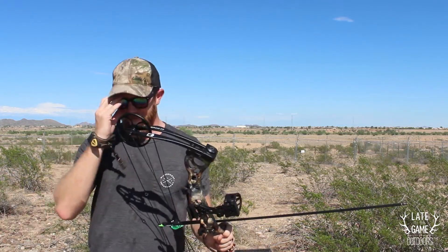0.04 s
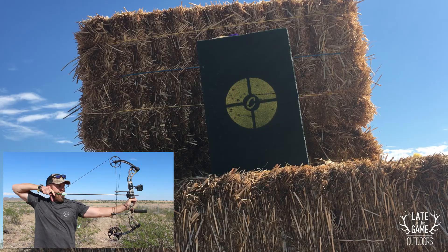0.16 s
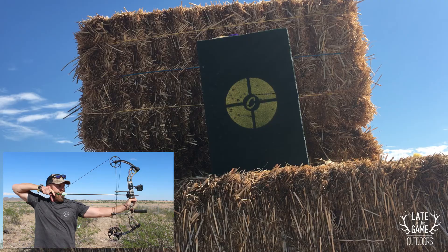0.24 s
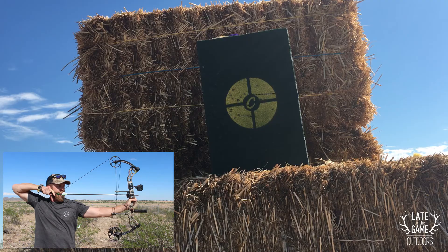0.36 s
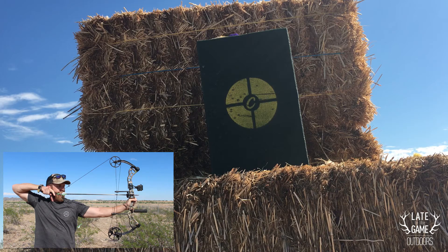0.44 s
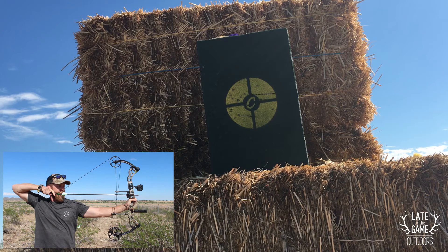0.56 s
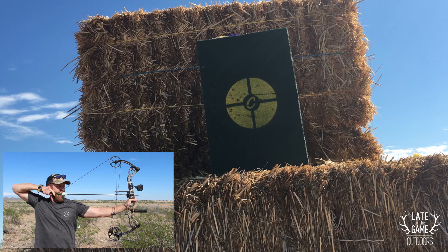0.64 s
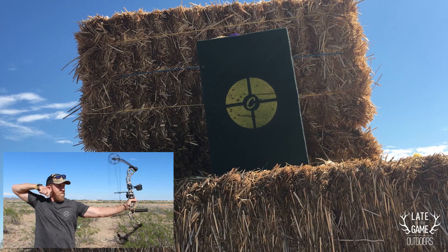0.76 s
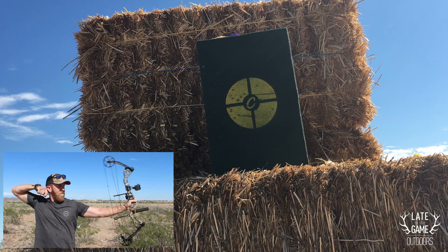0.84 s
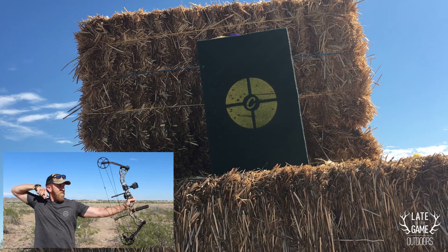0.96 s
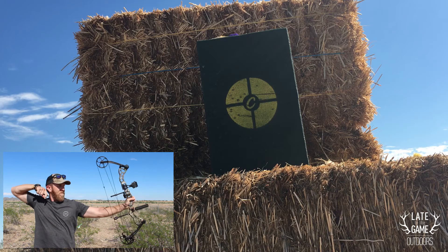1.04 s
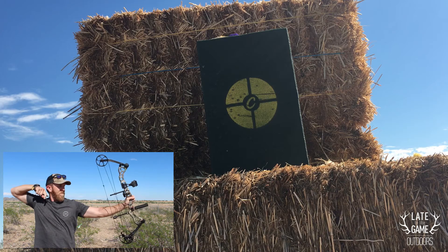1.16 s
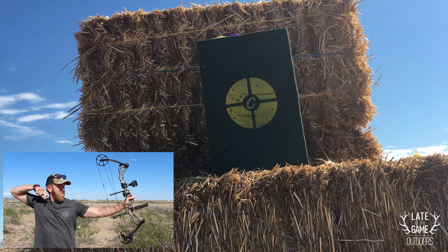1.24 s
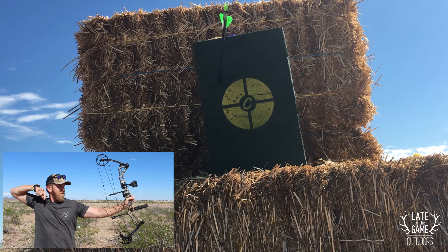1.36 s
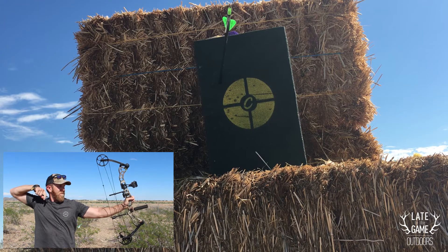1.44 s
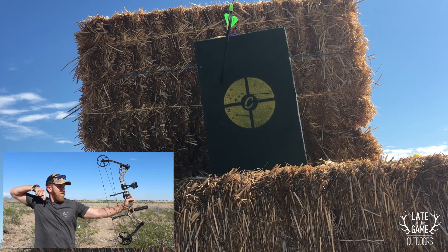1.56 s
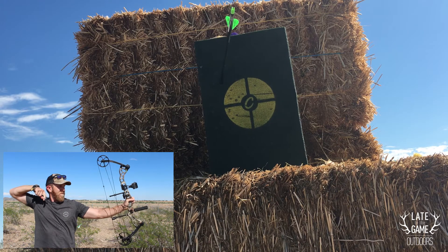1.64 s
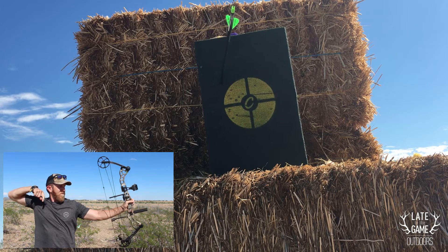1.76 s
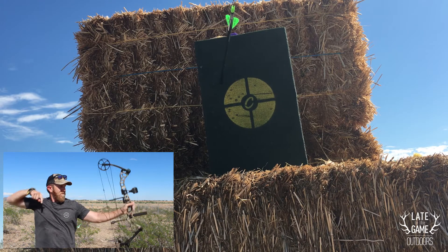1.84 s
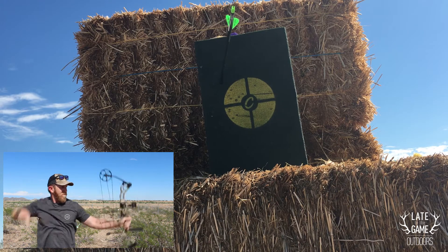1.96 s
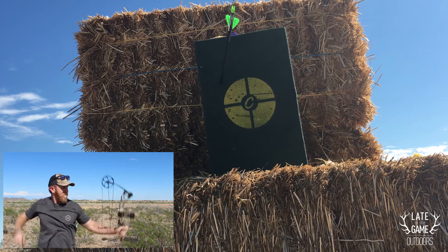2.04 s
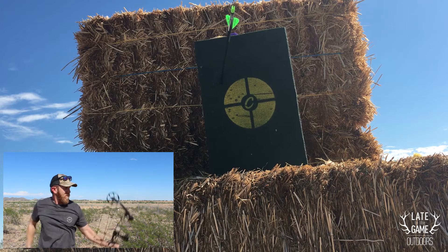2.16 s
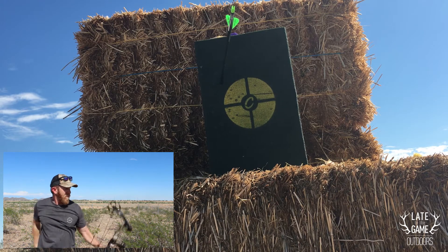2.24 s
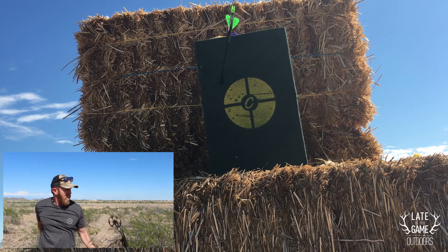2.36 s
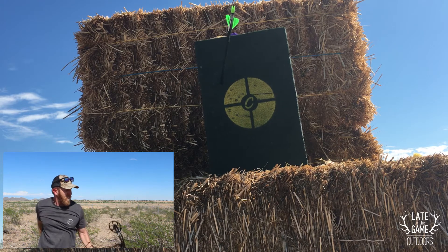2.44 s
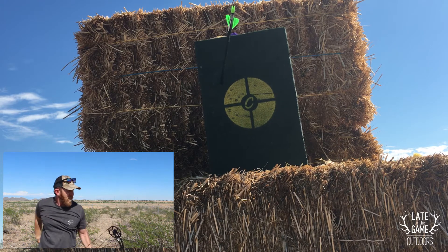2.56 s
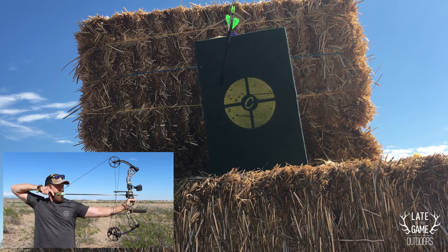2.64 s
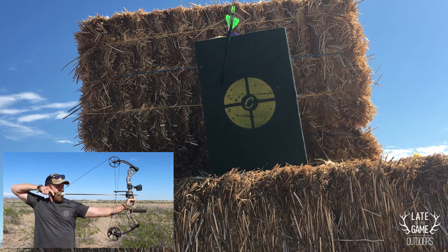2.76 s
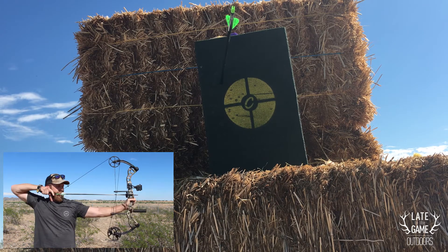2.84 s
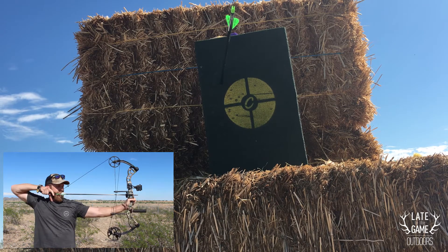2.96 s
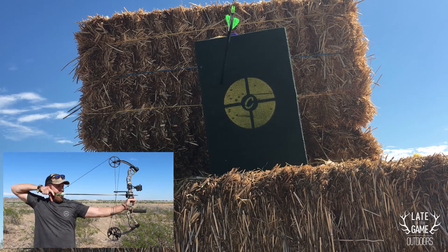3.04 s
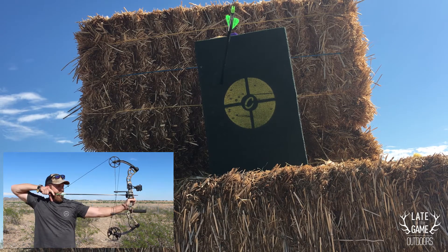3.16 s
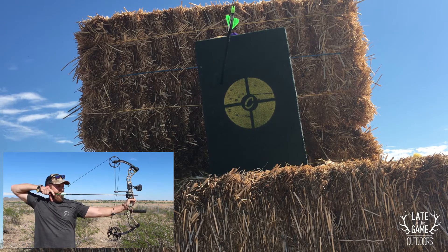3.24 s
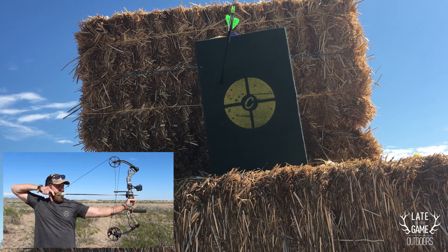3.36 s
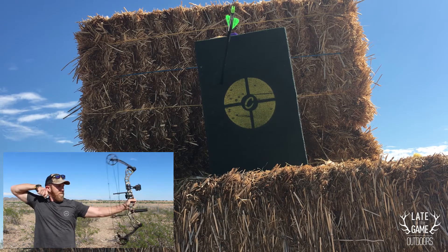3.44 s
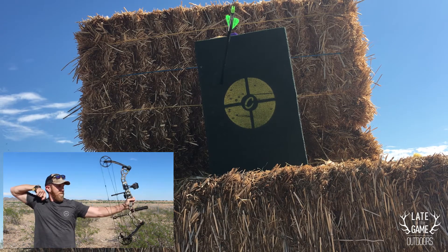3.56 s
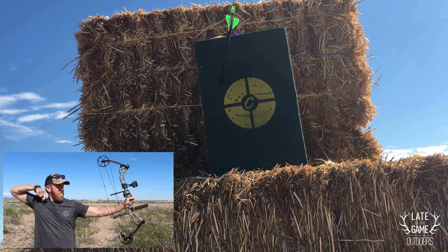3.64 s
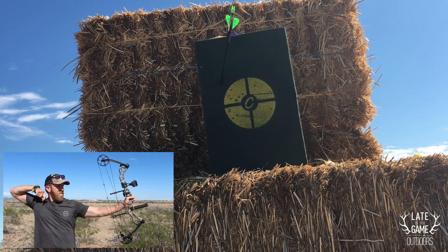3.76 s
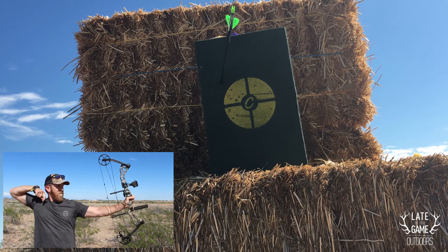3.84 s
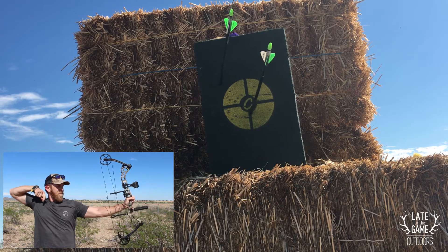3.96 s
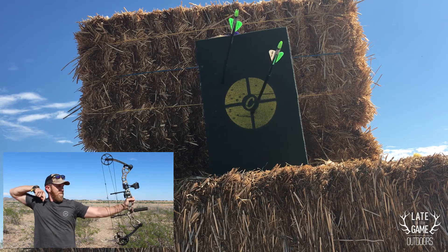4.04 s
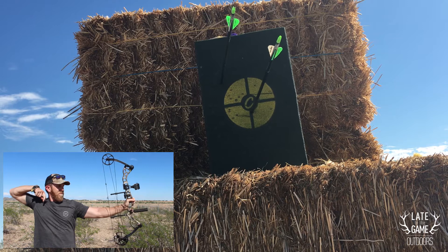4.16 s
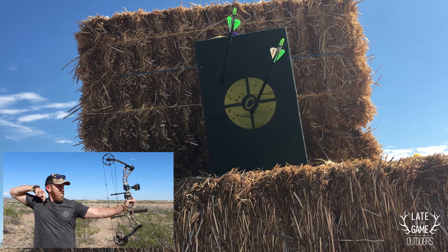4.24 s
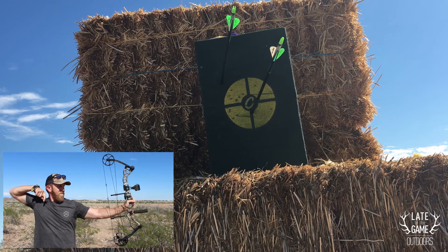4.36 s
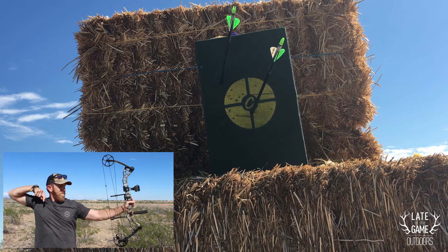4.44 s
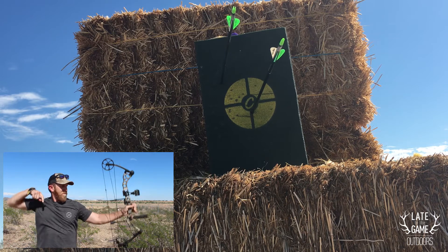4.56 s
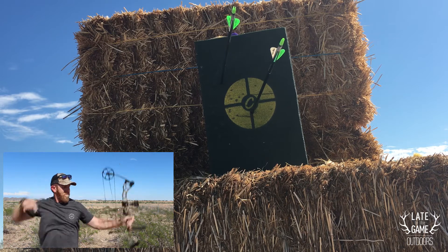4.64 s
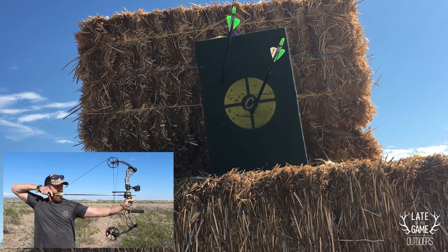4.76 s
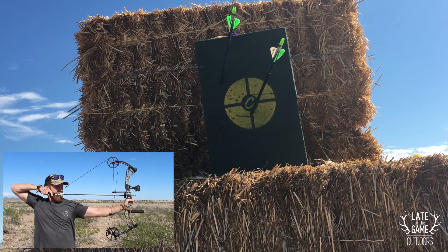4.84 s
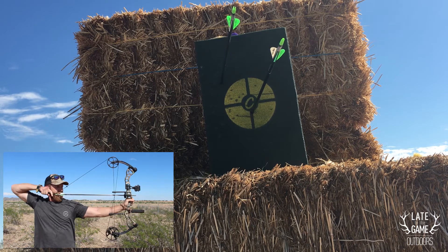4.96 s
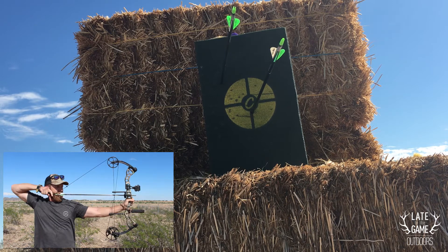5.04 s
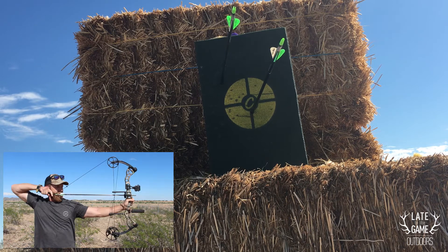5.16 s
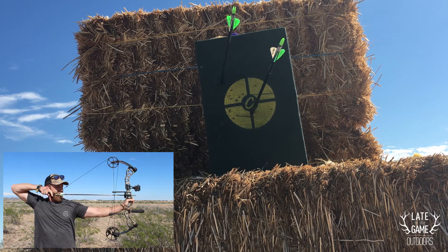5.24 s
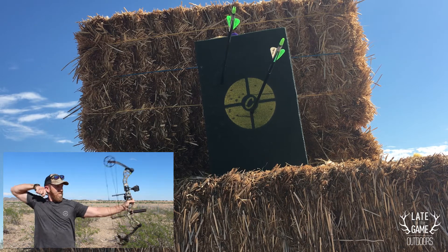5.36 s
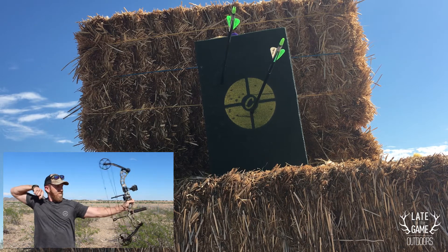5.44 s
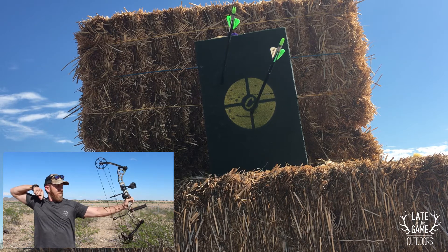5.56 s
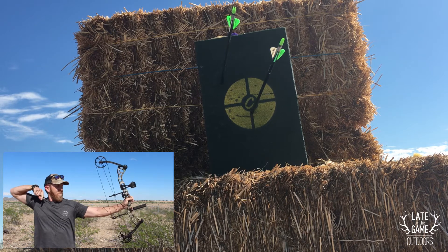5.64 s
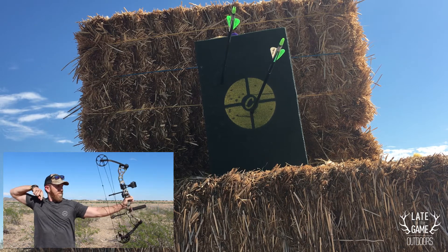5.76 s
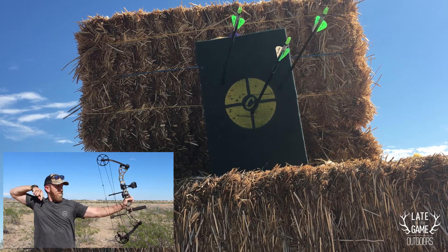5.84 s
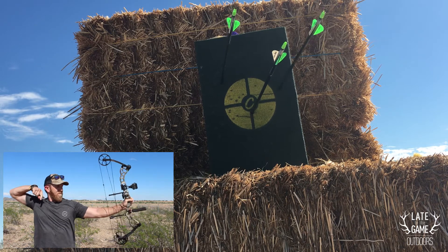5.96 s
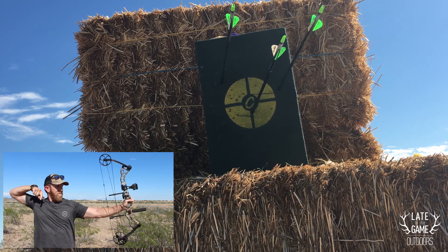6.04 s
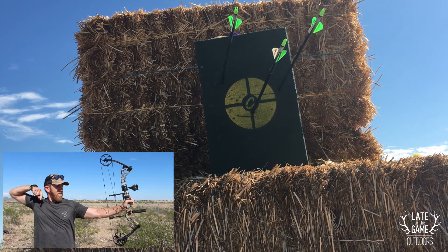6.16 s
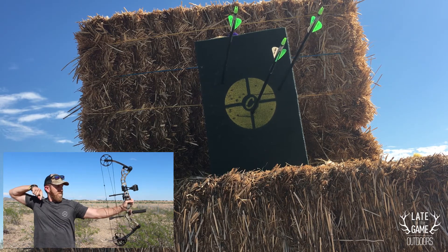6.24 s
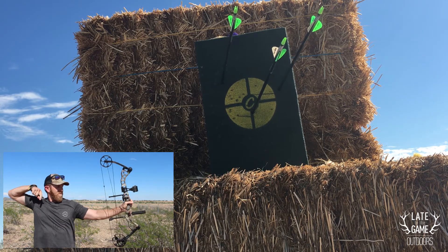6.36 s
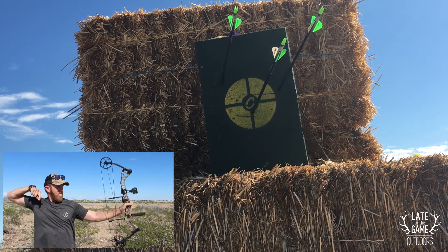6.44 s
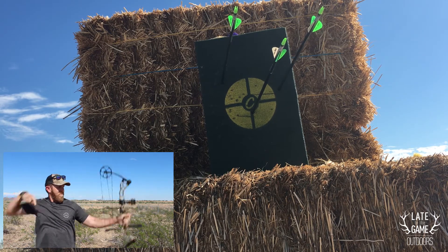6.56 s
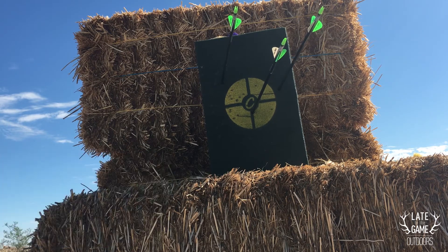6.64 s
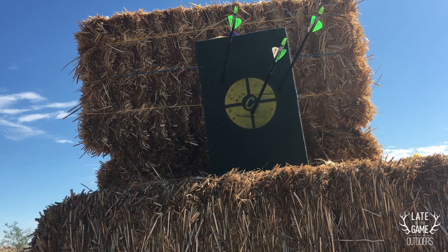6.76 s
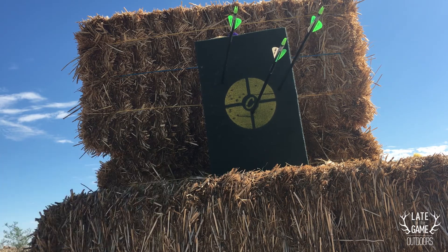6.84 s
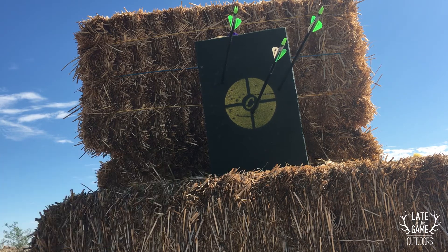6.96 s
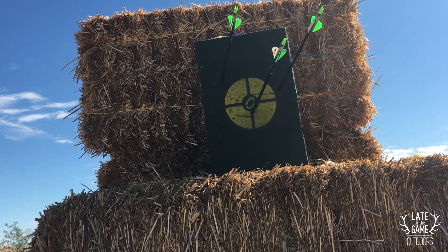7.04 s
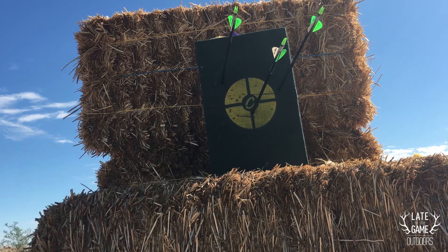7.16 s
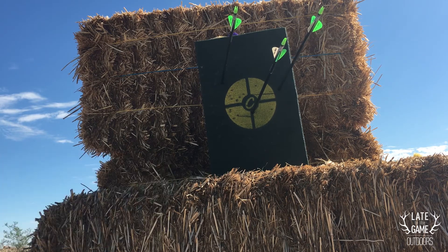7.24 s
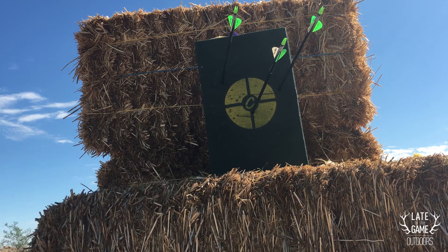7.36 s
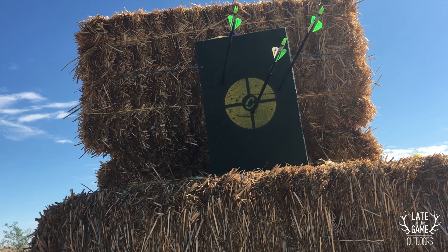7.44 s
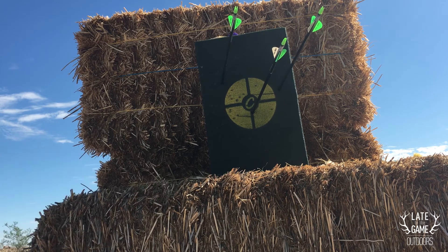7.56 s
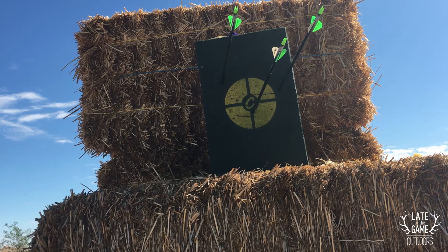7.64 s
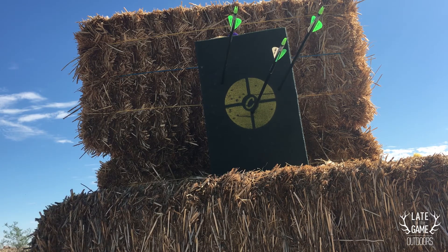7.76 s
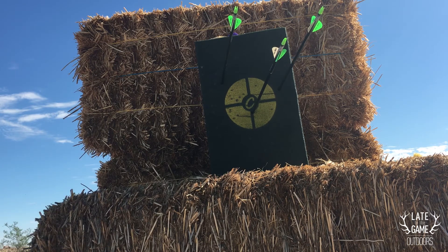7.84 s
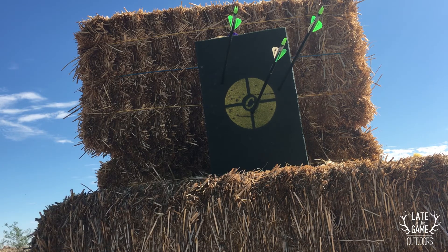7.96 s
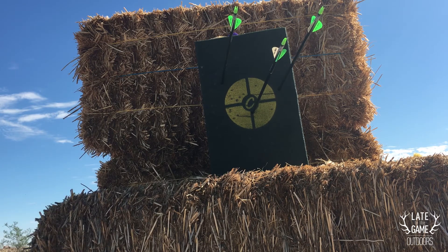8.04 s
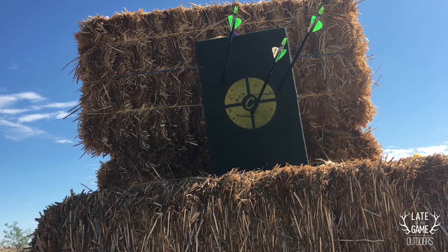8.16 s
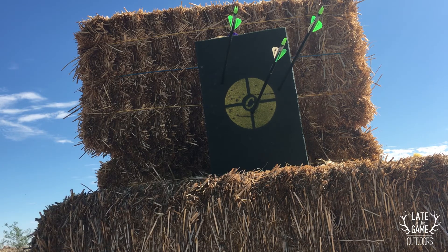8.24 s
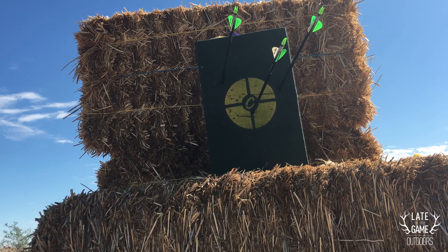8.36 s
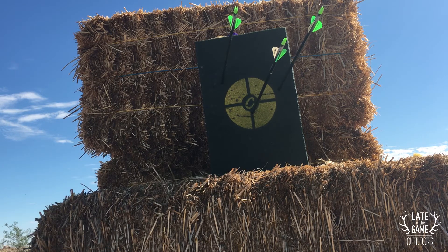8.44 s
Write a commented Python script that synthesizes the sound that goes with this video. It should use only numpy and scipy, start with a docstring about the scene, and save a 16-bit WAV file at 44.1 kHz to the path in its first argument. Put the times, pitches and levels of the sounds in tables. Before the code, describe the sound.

A compound bow fires three times, each sharp snap followed by an arrow thudding into a foam target, over faint hiss and light wind.

```python
"""Three shots from a compound bow at a foam target on straw bales, some 50 m off across open desert. Over still
air and light wind, a wide hiss sets in with a click some while before each shot. At the archer's microphone the
release clicks, the string zips forward and slams home, and the bow ringss. At a second microphone by the target
the vanes hiss in, the point cracks through and the block thuds; a soft hiss and faint crackles follow as the
hit travels back to the archer. Late on an insect ticks, a bird peeps and one faint knock sounds."""
import sys
import numpy as np
from scipy import signal
from scipy.fft import rfft, irfft, next_fast_len
from scipy.io import wavfile
from scipy.ndimage import uniform_filter1d

SR = 44100
rng = np.random.default_rng(int(sys.argv[2]) if len(sys.argv) > 2 else 0)


def materialize(psi):
    """Save the field psi as 16-bit PCM at rate SR to the path in sys.argv[1].

    A 1-D psi becomes a single channel; in a 2-D psi each row is a channel.
    """
    bounded = np.clip(np.atleast_2d(psi).T, -1, 1)
    quanta = np.round(bounded * 32767).astype(np.int16)
    wavfile.write(sys.argv[1], SR, quanta)


N = 374497
TIME = np.arange(N) / SR
AGE = np.arange(SR // 2) / SR  # seconds since a blow


def undb(db):
    """Amplitude ratio: tenfold for every 20 dB."""
    return 10 ** (np.asarray(db) / 20)


def add(track, s, sound):
    """Superposition: a sound adds to a track from time s on."""
    i = int(round(s * SR))
    track[i:i + len(sound)] += sound[:N - i]


def bin_gains(colour, size):
    """FFT bin gains, interpolated in log frequency between (frequency_hz, level_db) points."""
    hz, db = np.transpose(colour)
    bins = np.maximum(np.arange(size // 2 + 1) * SR / size, 1)
    return undb(np.interp(np.log(bins), np.log(hz), db))


def noise(colour, size=len(AGE)):
    """Spectral shaping: white noise filtered to a colour, at rms 1."""
    n = next_fast_len(size)
    y = irfft(rfft(rng.standard_normal(n)) * bin_gains(colour, n), n)[:size]
    return y / y.std()


def stereo_noise(colour, spread_hz=1300):
    """Decorrelation: treble noise in antiphase widens a middle of rms 1."""
    highpass = signal.butter(1, spread_hz, "high", fs=SR, output="sos")
    side = signal.sosfilt(highpass, noise(colour, size=N))
    return noise(colour, size=N) + side * np.array([[1], [-1]])


def impulse(colour, size=2048):
    """Minimum-phase pulse of peak 1: nothing sounds before the blow."""
    cepstrum = irfft(np.log(bin_gains(colour, size)))
    y = irfft(np.exp(rfft(2 * cepstrum[:size // 2], size)))
    return y / np.abs(y).max()


def resonant(peaks):
    """Spectrum of summed resonance curves (centre_hz, width_hz, level_db)."""
    hz = np.geomspace(100, SR / 2, 400)
    gain = sum(undb(db) / (1 + ((hz - centre ** 2 / hz) / width) ** 2) for centre, width, db in peaks)
    return np.column_stack([hz, 20 * np.log10(gain)])


def tilted(colour, slope_db):
    """Spectral tilt of slope_db per octave."""
    return [(hz, db + slope_db * np.log2(hz)) for hz, db in colour]


def fade(t60, rise_s):
    """Exponential decay, 60 dB in t60 seconds, after a quick rise."""
    return (1 - np.exp(-AGE / rise_s)) * 1000 ** (-AGE / t60)


def held(start_s, end_s, attack_s, release_s):
    """Trapezoidal envelope: opens, holds and closes."""
    return np.clip((TIME - start_s) / attack_s + .5, 0, 1) * np.clip((end_s - TIME) / release_s + .5, 0, 1)


def ring(modes, rise_s):
    """Free vibration: damped modes (pitch_hz, level_db, t60_s), alternating in sign, detuned per blow."""
    detune = 1 + .004 * rng.standard_normal(len(modes))
    return sum((-1) ** k * undb(db) * np.sin(2 * np.pi * hz * detune[k] * AGE) * fade(t60, rise_s)
               for k, (hz, db, t60) in enumerate(modes))


def span_and_flight(linger_s=.18):
    """Gating: for each shot, one envelope for the hiss span before the slam and one that lasts until just after
    the hit."""
    return [(held(span[0], shot[0] - span[1], attack_s=.003, release_s=.1),
             held(shot[0], hit[0] + linger_s, attack_s=.06, release_s=.11))
            for span, shot, hit in zip(HISS_SPANS, SHOTS, HITS)]


def dip(depth_db=-10, recovery_s=.2):
    """Gain that drops at each slam and recovers along a Gaussian curve."""
    return undb(depth_db * sum((TIME > s) * np.exp(-((TIME - s) / recovery_s) ** 2) for s, *_ in SHOTS))


# spectra of the still air and the wide hiss: frequency_hz, level_db
STILL_AIR = [(60, -11.5), (115, 2.5), (200, -12), (400, -22.5), (1000, -31.5), (2200, -37), (5000, -39.5),
             (8000, -38), (10500, -37.5), (14000, -35.5), (16000, -35)]
HISS_COLOUR = [(180, -31), (300, -0.5), (667, -3.5), (1040, -1), (1750, -8.5), (2280, -8), (2880, -5),
               (3640, -9), (4830, -8), (5610, -9), (6850, -9), (15000, -11), (16000, -21)]
# resonances of the hollow rush: centre_hz, width_hz, level_db
RUSH_PEAKS = [(400, 220, -5), (930, 340, 1), (1380, 75, -9.5), (1850, 590, -9), (2500, 200, -10.5),
              (2910, 350, -1.5), (3860, 410, -10.5), (5240, 640, -9), (5900, 300, -17), (6770, 400, -12.5),
              (9300, 1000, -18)]
# opening click, hollow rush and wind of each hiss span: start_s, end_before_slam_s, click_db, rush_db, wind_db
HISS_SPANS = [(0.122, 0.01, -30, -67.5, -44), (2.643, 0.075, -51.5, -62.5, -51), (4.762, 0.01, -32, -67.5, -46)]
# hollow rush and wind during each flight: rush_db, wind_db
FLIGHTS = [(-67.5, -48), (-74, -63.5), (-58, -48.5)]
CALM_S = 6.69  # the thin hiss and the breeze end here


def background(still_db=-61, thin_db=-74, span_db=-54.8, opening_db=-65):
    """Gated noise over still air: a wide hiss clicks on before each shot, a hollow rush fills each flight."""
    first_span_s = HISS_SPANS[0][0]
    wide = undb(thin_db) * dip() * held(first_span_s, CALM_S, attack_s=.002, release_s=.07)
    hollow = undb(opening_db) * held(0, first_span_s, attack_s=.002, release_s=.067)
    centre = undb(still_db) * noise(STILL_AIR, size=N)
    for (in_span, flying), span, (flight_db, _) in zip(span_and_flight(), HISS_SPANS, FLIGHTS):
        s, _, click_db, rush_db, _ = span
        wide = np.maximum(wide, undb(span_db) * in_span)
        hollow += undb(rush_db) * in_span + undb(flight_db) * flying
        add(centre, s, -undb(click_db) * np.exp(-AGE / .0045))
    return wide * stereo_noise(HISS_COLOUR) + hollow * stereo_noise(resonant(RUSH_PEAKS)) + centre


# spectrum of the rumble: frequency_hz, level_db
WIND_COLOUR = [(15, -9.5), (30, 6), (65, 1), (120, -8), (200, -17), (400, -30.5), (900, -46), (2000, -72.5)]
# gusts: crest_s, half_length_s, level_db
GUSTS = [(.6, 0.037, -33), (.72, .05, -38.5), (2.169, 0.063, -48.5), (3.929, 0.07, -47),
         (5.65, 0.0797, -48), (6.6, .15, -54.5), (8.47, 0.044, -55)]
# wind bumping a microphone: start_s, level_db, pitch_hz, rise_s
BUFFETS = [(0.1232, -26, 42.8, 0.0011), (0.598, -18, 68.3, 0.018), (1.772, -21.5, 47.6, 0.0012)]


def wind(breeze_db=-52, calm_db=-62.5, gust_top_hz=110):
    """Turbulence at the microphones: a rumble, stronger around each shot, with deep gusts and bumps."""
    breeze = undb(breeze_db) * dip() * held(0, CALM_S, attack_s=.0016, release_s=.2)
    power = undb(calm_db) ** 2 + breeze ** 2  # incoherent sources add in power
    for (in_span, flying), (*_, span_db), (_, flight_db) in zip(span_and_flight(), HISS_SPANS, FLIGHTS):
        power += (undb(span_db) * in_span) ** 2 + (undb(flight_db) * flying) ** 2
    rumble = noise(WIND_COLOUR, size=N) + undb(-26) * noise(WIND_COLOUR, size=N) * np.array([[1], [-1]])
    deep = signal.sosfilt(signal.butter(2, gust_top_hz, fs=SR, output="sos"), noise(WIND_COLOUR, size=N))
    gusts = sum(undb(db) * np.exp(-((TIME - s) / half_s) ** 2 / 2) for s, half_s, db in GUSTS)
    bumps = np.zeros(N)
    for s, db, hz, rise_s in BUFFETS:
        add(bumps, s, undb(db) * ring([(hz, 0, .13)], rise_s=rise_s))
    return rumble * np.sqrt(power) + deep * gusts + bumps


def bird(start_s=4.672, pitch_hz=1840, level_db=-55):
    """A damped pure tone: one faint, far peep."""
    out = np.zeros(N)
    add(out, start_s, undb(level_db) * np.sin(2 * np.pi * pitch_hz * AGE) * fade(t60=.05, rise_s=.004))
    return out


# runs of insect ticks: start_s, tick_count, level_db
TICK_RUNS = [(4.556, 3, -61), (6.485, 2, -62), (6.620, 3, -59.5), (6.877, 2, -65.5), (7.062, 1, -58.5),
             (8.245, 1, -65.5), (8.476, 1, -65.5)]


def insect(gap_s=.058, width_s=.006):
    """Pulse trains from the scrub: evenly spaced Gaussian bursts of very high noise."""
    out = np.zeros(N)
    burst = np.exp(-(AGE / width_s - 5) ** 2 / 2)
    for s, count, db in TICK_RUNS:
        for k in range(round(count)):
            rasp = noise([(4500, -16.5), (6800, -3), (9000, 4), (14500, 1), (16000, -9)])
            add(out, s + k * gap_s - 5 * width_s, undb(db) * rasp * burst)
    return out


# a knock once the last arrow is in: start_s, level_db, pitch_hz
KNOCK = (6.385, -60.5, 1500)


def small_knock():
    """A broad resonance dies quickly: one faint, dry knock."""
    out, (s, db, hz) = np.zeros(N), KNOCK
    add(out, s, undb(db) * noise(resonant([(hz, hz, 0)])) * fade(t60=.04, rise_s=.001))
    return out


def hiss_and_crackle(hiss_db=-66, crackles_per_s=45, crackle_db=-54, scatter_db=3, decay_s=.3):
    """A soft steady hiss holds briefly after each hit; faint straw crackles fade as a Poisson process."""
    out, hiss = np.zeros(N), noise(HISS_COLOUR, size=N)
    for s, *_ in HITS:
        out += undb(hiss_db) * hiss * held(s, s + .42, attack_s=.0099, release_s=.06)
        waits = np.cumsum(rng.exponential(size=20)) / crackles_per_s
        for wait, db in zip(waits, crackle_db + scatter_db * rng.standard_normal(20)):
            stalk = undb(db) * noise(BRIGHT_COLOUR) * fade(t60=.021, rise_s=.00031)
            add(out, s + wait, stalk * np.exp(-wait / decay_s))
    return out


# spectrum of the vanes, also of bright snaps and crackles: frequency_hz, level_db
BRIGHT_COLOUR = [(290, -39), (500, -14.5), (1300, -6), (2810, -2.5), (4940, -7), (6330, -8), (9920, -11.5),
                 (14000, -9.5), (16000, -10.5)]


def vanes(swell_s=.018):
    """Flow noise of the fletching, swelling as the arrow closes in and ending at the impact."""
    swell = np.exp(-(AGE / swell_s) ** 2) + .14 * np.exp(-AGE / .031)
    return (noise(BRIGHT_COLOUR) * swell)[::-1]


# spectra of the hit at the target and back at the archer: frequency_hz, level_db
CRACK_COLOUR = [(200, -8.5), (550, 3.5), (950, -12.5), (1400, -6.5), (2150, 4.5), (3100, -14.5),
                (3900, -2.5), (4600, -14.5), (5700, -2), (7800, -14), (12000, -13), (16000, -16)]
FAR_COLOUR = [(150, -2.5), (420, -0.5), (700, -0.5), (1050, -0.5), (1400, -9.5), (1800, -11), (2200, -5),
              (2900, -16), (3900, -22), (5400, -14.5), (6300, -38), (8000, -71), (11000, -79)]
# modes of the foam block: pitch_hz, level_db, t60_s
BLOCK_MODES = [(72.6, -8.5, 0.13), (137.9, -2.5, 0.0503), (243, -2.5, 0.034), (405.7, -1, 0.043),
               (545.5, -5.5, 0.0269)]
# impacts, with relative gains: start_s, crack_db, rub_db, thud_db, vane_db, far_db, tilt_db_per_octave
HITS = [(1.4604, -15.5, -21.5, -19.5, -33, -36, -1), (4.1200, -14, -27.5, -15.5, -35, -35.5, 1.5),
        (6.024, -12, -22.5, -16, -34, -39, 1.5)]
# the point snapping through a tougher layer: start_s, level_db
LAYER_SNAPS = [(1.4631, -3.5), (1.4656, -22.5), (4.1224, -13.5)]


def target(stop_s=.0092, travel_s=.142):
    """Inelastic impact: the point cracks the skin, friction stops the shaft, the block shoves the straw."""
    out = np.zeros(N)
    for s, crack_db, rub_db, thud_db, vane_db, far_db, tilt_db in HITS:
        near, far = tilted(CRACK_COLOUR, tilt_db), tilted(FAR_COLOUR, tilt_db)
        add(out, s - len(AGE) / SR, undb(vane_db) * vanes())
        add(out, s, undb(crack_db + 7) * impulse(near))
        add(out, s, undb(crack_db + 5) * noise(near) * fade(t60=.0087, rise_s=.0001))
        add(out, s, undb(rub_db) * noise(near) / (1 + (AGE / stop_s) ** 12))
        add(out, s, undb(thud_db - 11.5) * ring(BLOCK_MODES, rise_s=.0022))
        add(out, s + stop_s, undb(thud_db + 3.5) * ring(BLOCK_MODES, rise_s=.0024))
        straw = noise(CRACK_COLOUR) * undb(4 * np.repeat(rng.standard_normal(len(AGE) // 50), 50))
        crush = undb(-38.5) * fade(t60=.062, rise_s=.0011) + undb(-64) * fade(t60=.56, rise_s=.01)
        add(out, s + stop_s, straw * crush)
        # the sound travels back to the archer, dulled by the air and scattered by the ground
        back_s = s + travel_s
        scatter = noise(far) * (fade(t60=.03, rise_s=.00071) + undb(-20) * fade(t60=.33, rise_s=.0028))
        block_face = ring([(1065, 1, .039), (844, -5, .046)], rise_s=.00024)
        add(out, back_s, undb(far_db + 11) * impulse(far))
        add(out, back_s, undb(far_db + 4.5) * scatter + undb(far_db + 3) * block_face)
        add(out, back_s + stop_s, undb(far_db + 4.5) * ring(BLOCK_MODES[2:], rise_s=.001))
    for s, db in LAYER_SNAPS:
        add(out, s, undb(db) * noise(CRACK_COLOUR) * fade(t60=.012, rise_s=.0002))
    return out


# spectrum of the zip's grit, the release and the sliding shaft: frequency_hz, level_db
RELEASE_COLOUR = [(350, -34.5), (600, -6.5), (1280, -9), (2990, -3), (4160, -12.5), (5790, -9.5),
                  (8390, -18), (12800, -19.5), (16000, -30)]


def string_zip(pitch_hz, stroke_s, doubling_s=.0058, swell_s=.0028, roughness=.86, grit=.15):
    """A rough exponential chirp: the string races over the cams, passing pitch_hz 5 ms before the slam."""
    t = AGE[:int((stroke_s + .002) * SR)] - stroke_s  # zero at the slam
    hz = np.minimum(pitch_hz * 2 ** ((t + .005) / doubling_s), SR / 3)
    wobble = uniform_filter1d(rng.standard_normal(len(t)), size=16) * roughness
    phase = 2 * np.pi * np.cumsum(hz * (1 + wobble)) / SR
    swell = np.exp(-np.abs((t + .0019) / swell_s) ** 1.1) * np.clip((t[-1] - t) / .0028, 0, 1)
    return swell * (1.3 * np.sin(phase) + grit * noise(RELEASE_COLOUR, size=len(t)))


# spectrum of the bow's rattle: frequency_hz, level_db
RATTLE_COLOUR = [(71, -41), (120, -12), (334, -7.5), (393, -11.5), (493, -0.5), (684, -8), (1260, -7.5),
                 (1460, -19.5), (1750, -8.5), (2290, -20.5), (3050, -9.5), (4230, -30), (5520, -26),
                 (13000, -40.5), (16000, -49)]


def string_rattle(rate_hz=105, tap_s=.0019):
    """Amplitude modulation: noise pulses as the swinging string taps its stop, never quite evenly."""
    jitter = np.repeat(rng.standard_normal(50), len(AGE) // 50)
    cycles = np.cumsum(rate_hz * (1 + .15 * jitter) / SR)
    taps = np.exp(-(cycles % 1) / rate_hz / tap_s)
    rattle = undb(-23) * noise(RATTLE_COLOUR) * fade(t60=.23, rise_s=.0035) * (1 + .8 * taps)
    ticks = undb(-24.5) * noise(BRIGHT_COLOUR) * fade(t60=.12, rise_s=.003) * taps
    return rattle + ticks


# spectrum of the string slamming home: frequency_hz, level_db
SLAM_COLOUR = [(71, -44), (120, -21.5), (454, -6.5), (1340, -10.5), (1680, -3.5), (2240, -7), (3050, 1.5),
               (3520, -13.5), (5080, -21), (6240, -13.5), (7350, -25), (13600, -37), (16000, -46)]
# modes of the stiff, heavily damped frame: pitch_hz, base_width_hz, level_db
FRAME_MODES = [(279, 23.5, -8), (440, 31, -6.5), (523, 17, -1), (670, 27.5, -5.5), (891, 22, -4),
               (1059, 32.5, -1.5), (1516, 85, -9), (2006, 19.5, -9), (2450, 26.5, -12.5), (2500, 48, -4.5),
               (3110, 76, -3), (5900, 59, -16), (6400, 60.5, -17.5), (6770, 25, -22)]
# modes of the limbs and cables, and of the string: pitch_hz, level_db, t60_s
LIMB_MODES = [(805, -2.5, 0.15), (886, -2.5, 0.21), (1060, -4.5, 0.12), (1255, -3, 0.16), (1810, 0.5, 0.14),
              (1940, -4.5, 0.089), (2130, -4, 0.057), (3050, -5, 0.13), (3116, -6, 0.099),
              (3780, -19.5, .11)]
STRING_MODES = [(221.5, -13, 0.59), (501, -.5, 0.4)]
# shots, with relative gains: slam_s, level_db, click_db, click_hz, zip_db, zip_hz, snap_db
SHOTS = [(0.8088, 1.5, -27.5, 2796, -10.5, 2955, -10.5), (3.4676, 1, -29.5, 1920, -9.5, 2550, -6.5),
         (5.3750, 1.5, -23, 2960, -11.5, 2710, -9.5)]


def bow(stroke_s=.026, second_cam_s=.0043, body_cutoff_s=.06, twang_cutoff_s=.128):
    """Impulse excitation: the released string drives the arrow, slams home and sets the bow ringing."""
    out = np.zeros(N)
    frame_modes = [(hz, db, 1.9 / (width + 22)) for hz, width, db in FRAME_MODES]  # wider dies sooner
    for s, db, click_db, click_hz, zip_db, zip_hz, snap_db in SHOTS:
        loose_s = s - stroke_s
        jaw_noise = 1.2 * noise(RELEASE_COLOUR) * fade(t60=.01, rise_s=.00026)
        jaw_ring = ring([(click_hz, 2, .02)], rise_s=.00046)
        add(out, loose_s, undb(click_db) * (jaw_noise + jaw_ring))
        slide = noise(RELEASE_COLOUR) * fade(t60=.25, rise_s=.0011) / (1 + (AGE / stroke_s / 2) ** 4)
        add(out, loose_s - .003, undb(-42) * slide)  # the shaft slides off its rest
        add(out, loose_s, undb(zip_db) * string_zip(zip_hz, stroke_s))
        # the two cams come home a few milliseconds apart
        add(out, s, undb(-2) * impulse(SLAM_COLOUR))
        add(out, s + second_cam_s, undb(-7) * impulse(SLAM_COLOUR))
        slam = undb(-5.5) * noise(SLAM_COLOUR) * fade(t60=.032, rise_s=.00069)
        snap = undb(snap_db) * noise(BRIGHT_COLOUR) * fade(t60=.011, rise_s=.0018)
        frame = undb(-11) * ring(frame_modes, rise_s=.00089)
        limbs = undb(-28.5) * ring(LIMB_MODES, rise_s=.003)
        # the rattle cuts off first, then the string's note drops away quickly
        body = (limbs + string_rattle()) / (1 + (AGE / body_cutoff_s) ** 5)
        twang = undb(-30.5) * ring(STRING_MODES, rise_s=.0043) / (1 + (AGE / twang_cutoff_s) ** 8)
        add(out, s - .001, undb(db) * (slam + snap))
        add(out, s, undb(db) * (frame + body + twang))
    return out


def scene():
    """Superposition: shots and hits sit in the middle, with the hiss spread around them."""
    return bow() + target() + hiss_and_crackle() + small_knock() + insect() + bird() + wind() + background()


def record(dry, ceiling=.93, top_hz=16000):
    """Hard clipping flattens the loudest peaks, then a steep low-pass cuts the top."""
    lowpass = signal.ellip(10, .2, 80, top_hz, fs=SR, output="sos")
    return signal.sosfilt(lowpass, np.clip(dry, -ceiling, ceiling))


dry = scene()
out = record(dry)
materialize(out)
```